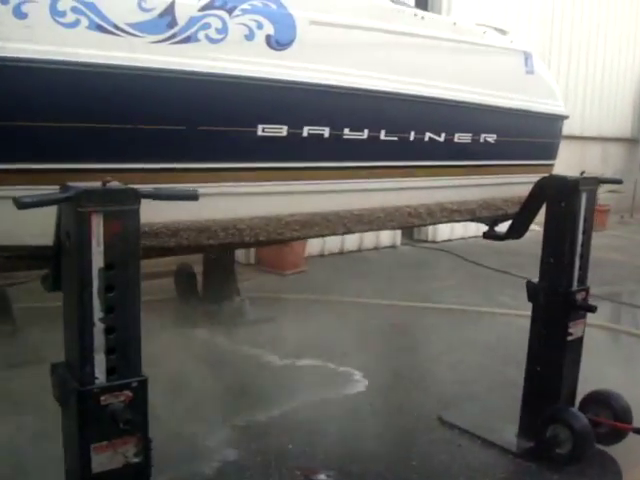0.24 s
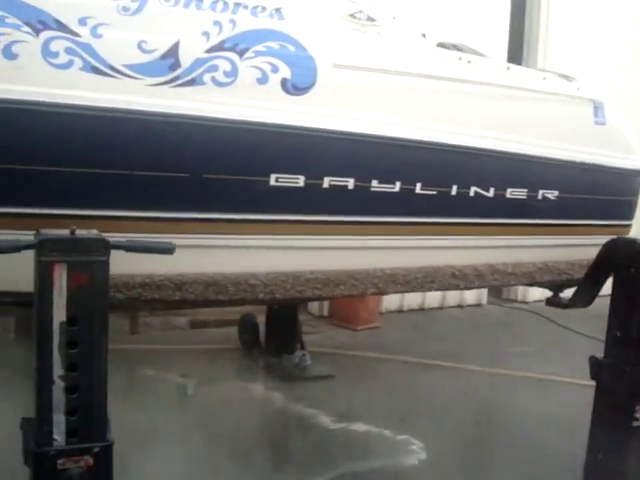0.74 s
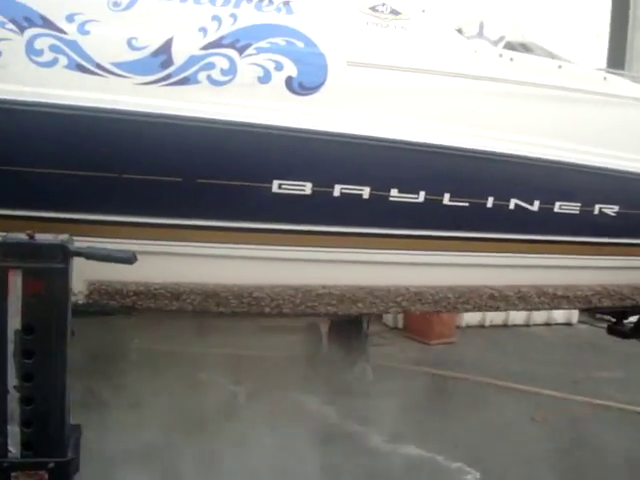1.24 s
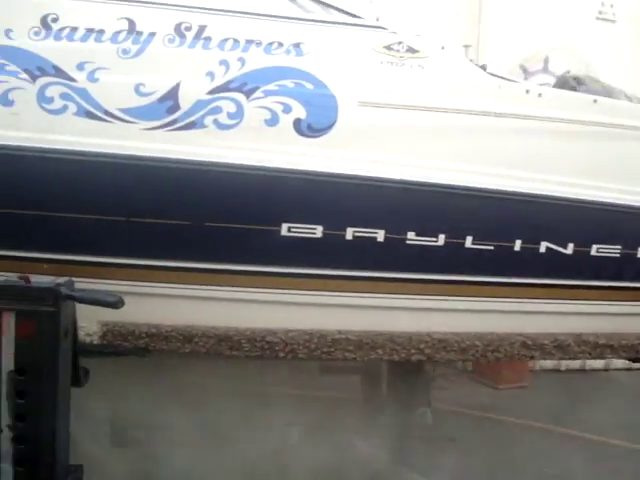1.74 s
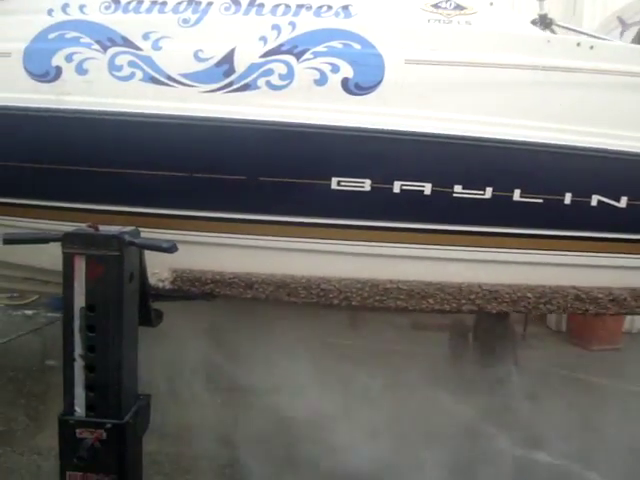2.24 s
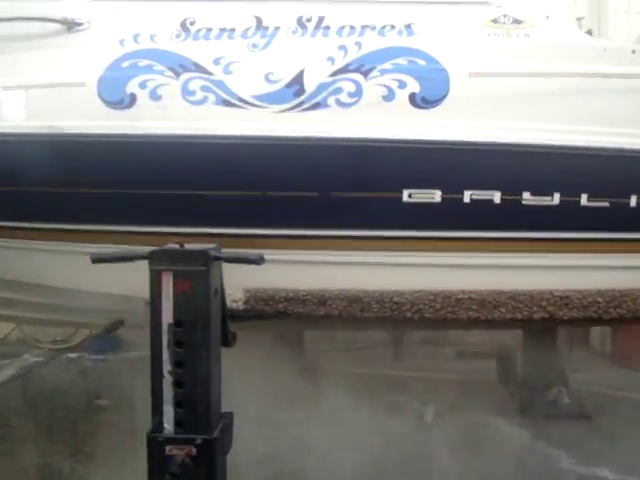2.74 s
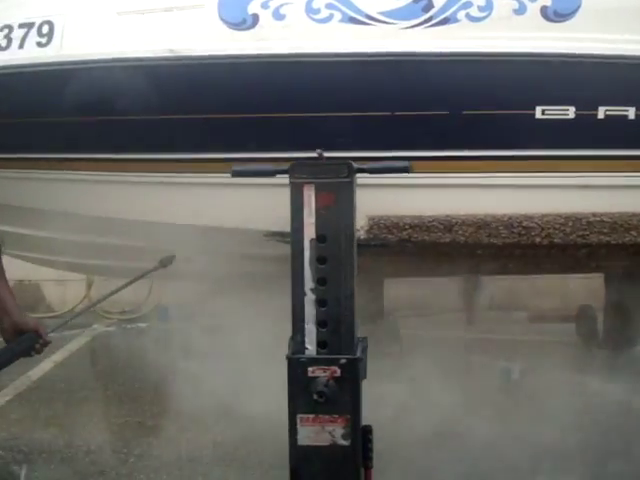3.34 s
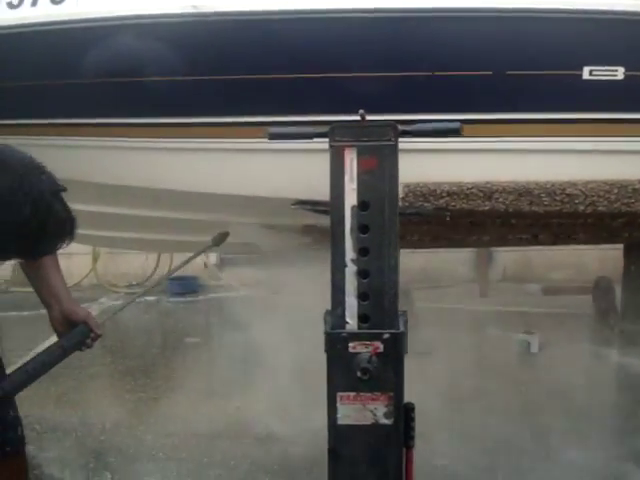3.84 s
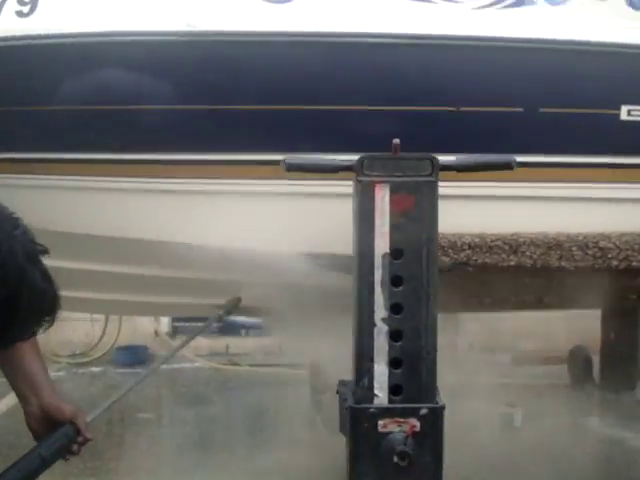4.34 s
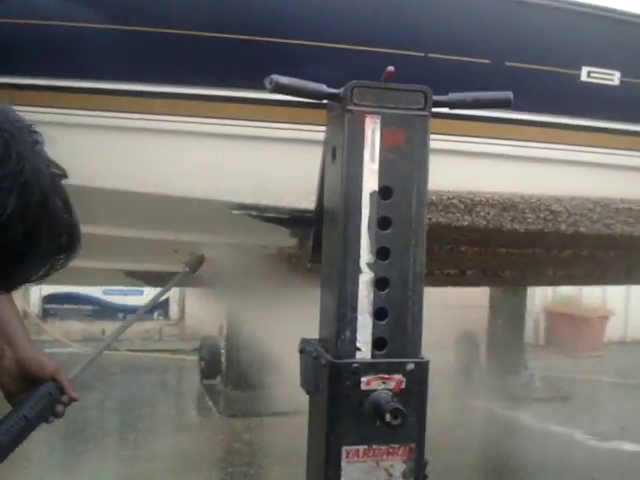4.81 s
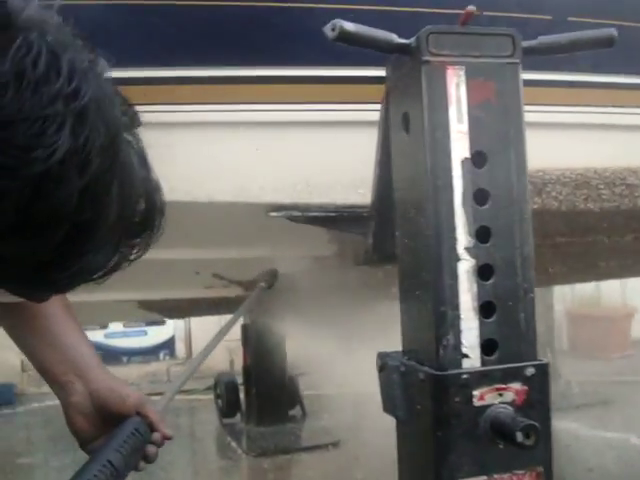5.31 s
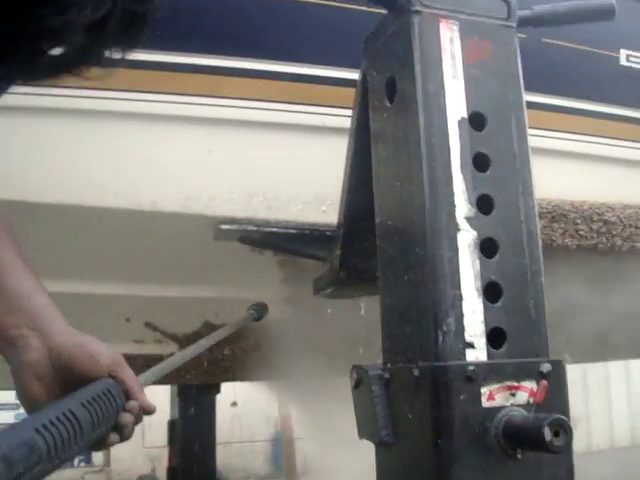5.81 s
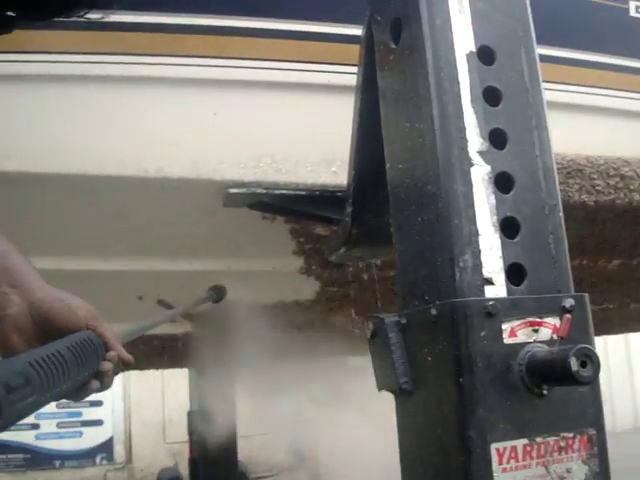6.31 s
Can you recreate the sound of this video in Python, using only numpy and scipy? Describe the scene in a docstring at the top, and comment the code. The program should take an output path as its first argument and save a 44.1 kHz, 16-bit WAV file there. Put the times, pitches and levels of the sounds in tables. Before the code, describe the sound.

A pressure washer's spinning jet roars, buzzes and hisses against a hollow boat hull, swelling and easing as the spray moves.

```python
"""A pressure washer's spinning jet strips growth off a boat hull, a few steps away in an open yard.
From the start, one blow a turn drives the hollow shell's panel modes, their balance set by where the jet
lands; torn water roars and hisses in that rhythm, grit spatters and the pump hums far off.
Near 1.7 s the jet digs in and roar, drone and whine swell; near 2.9 s it slips off and the roar drops.
The spray's hiss then peaks near 4.2 s and 5.3 s, and near 5.7 s a square hit turns roar into slaps."""
import sys
import numpy as np
from scipy import signal
from scipy.fft import rfft, irfft, next_fast_len
from scipy.io import wavfile
from scipy.ndimage import uniform_filter1d, map_coordinates

SR = 44100
rng = np.random.default_rng(int(sys.argv[2]) if len(sys.argv) > 2 else 0)


def wrap_up_sound(samples):
    """Save the sound to the file named by the first command line argument, as 16-bit audio."""
    columns = np.atleast_2d(samples).T
    # keep every value between -1 and 1, then stretch to whole-number steps
    tamed = np.clip(columns, -1, 1)
    steps = np.round(tamed * 32767).astype(np.int16)
    wavfile.write(sys.argv[1], SR, steps)


N = 289296

# Rotation of the jet (time [s], rate [turns/s])
JET_SPEED = [(0, 163.9), (.45, 167), (.7, 165.5), (1.1, 166.4), (2.2, 164.4), (2.6, 166), (2.9, 163),
             (3.85, 163), (4.15, 161.5), (4.35, 162.5), (4.8, 161.9), (5.2, 163), (5.45, 162.4),
             (6.56, 165.6)]
# Roar on the hull, rising as the jet digs in and falling as it slips off (time [s], level [dB])
ROAR_LEVEL = [(0, -28), (.44, -29.5), (.52, -32.5), (.86, -33), (1.3, -30), (1.56, -26), (1.69, -21),
              (1.8, -21.5), (1.97, -25), (2.1, -22), (2.41, -21.5), (2.48, -25), (2.62, -22.5),
              (2.82, -24.5), (2.9, -30), (3.35, -27.5), (3.6, -28.5), (4.02, -26), (4.1, -28.5),
              (4.78, -33), (5.03, -26.5), (5.12, -30), (5.56, -31.5), (5.66, -29.5), (6.3, -33.5),
              (6.45, -28), (6.56, -29.5)]
# Panel modes of the hull
# (frequency [Hz], half-width [Hz], offset [dB], gain with lean [dB/dB], extra gain with roar [dB/dB])
PANEL_MODES = [(167, 33, 0.5, 0.5, 0), (322.4, 28, 1, 1, 0), (481, 28, 0.8, -1, 0.05),
               (659.6, 33, -0.3, -0.95, 0), (815, 54, -0.5, 1, 0), (1173, 79, 0, -0.1, 0.25)]
# Boom of mode 1 (time [s], level [dB])
BOOM_LEVEL = [(0, -53), (.68, -75), (1.4, -62), (1.7, -53), (2.84, -49.5), (2.96, -59), (3.18, -47.5),
              (4.2, -52), (4.34, -61), (4.9, -55.5), (6.1, -61), (6.3, -50), (6.56, -60)]
# Drone of modes 2 and 3 (time [s], level [dB], lean towards mode 2 [dB])
DRONE_LEVEL = [(0, -37, -5), (.28, -47, 8), (.72, -51, 2), (1.04, -43, 3), (1.7, -32, -1),
               (2.15, -35, -7.5), (2.38, -31, -4), (2.6, -30.5, -3), (3.2, -46, -3.5), (3.5, -41, -2.5),
               (3.95, -35, -2.5), (4.1, -40.5, -2.5), (4.55, -37.5, -2), (5.2, -41.5, -1.5),
               (5.42, -35, -4.5), (5.6, -38.5, 1), (6.06, -41, -3.5), (6.24, -51, -4), (6.56, -48.5, -3)]
# Whine of modes 4 to 6 (time [s], level over the roar [dB], lean from mode 4 to mode 5 [dB])
WHINE_LEVEL = [(0, -10, -2), (.25, -14.5, 3), (.78, -14, -3), (.92, -8, 7), (1.45, -5, 4),
               (1.73, -1.5, 3.5), (2.0, -5.5, -5), (2.2, -5.5, 2.5), (2.7, -6, 1), (3.2, -10, -4.5),
               (3.53, -6, -7.5), (3.75, -16.5, -8.5), (4.02, -9, -7), (4.14, -22, -4), (4.3, -8, 4),
               (4.78, -18, -4), (4.96, -8.5, -1), (5.5, -22, -4), (5.64, -7, 0.5), (6.2, -15, -3),
               (6.56, -17, -5)]
# Rumble of the shell (frequency [Hz], relative level [dB])
RUMBLE_SPECTRUM = [(30, -11), (100, 0), (220, -0.5), (500, -28.5), (2000, -70)]
# How squarely the jet bites (time [s], slap over roar [dB], relative throb depth [0-1])
JET_BITE = [(0, -6, .3), (1.3, -3, 0.32), (1.72, 0.5, 0.1), (2.2, -2, .05), (3.4, 1, 0.53), (3.9, -7, 0.2),
            (4.4, -1, 0.63), (5.25, 1, 0.3), (5.68, 7.5, .6), (6.25, -8, 0.66), (6.56, 0.5, 0.63)]
# Roar of torn water (frequency [Hz], relative level [dB])
ROAR_SPECTRUM = [(30, -47.5), (100, -32), (250, -15.5), (400, -6.5), (700, 1.3), (1200, -0.5), (2000, -2.5),
                 (3500, -12), (8000, -25.5)]
# Slap of one blow (frequency [Hz], relative level [dB])
SLAP_SPECTRUM = [(300, -32), (700, -0.5), (1000, -13), (1300, 3.5), (1900, -3), (3000, -10.5),
                 (5000, -20.5), (10000, -22)]
# Buzz of the hull's skin (harmonic [multiple of the rotation rate], relative level [dB])
BUZZ_HARMONICS = [(6, 3), (7, -1), (8, 4), (9, -2.5), (10, 2), (11, 0.5), (12, -0.5), (13, -8), (14, -8),
                  (15, -5), (16, -8), (18, -3)]
# Hiss of the spray (time [s], relative level [dB])
SPRAY_ENVELOPE = [(0, -26), (.45, -25.5), (.52, -28.5), (1.05, -27), (1.3, -31.5), (1.68, -24.5),
                  (2.38, -23.5), (2.5, -27.5), (2.9, -27.5), (3.52, -28.5), (3.62, -25), (4.15, -22),
                  (4.38, -24.5), (4.86, -23.5), (4.93, -26.5), (5.3, -22.5), (5.5, -26), (6.1, -26),
                  (6.56, -34)]
# Colour of the spray (frequency [Hz], relative level [dB])
SPRAY_SPECTRUM = [(200, -33), (700, -36), (1500, -10), (2200, -0.5), (3000, 0.5), (4200, -2), (6000, -6),
                  (10000, -17.5)]
# High hiss of the mist (time [s], relative level [dB])
MIST_ENVELOPE = [(0.0, -27), (0.04, -26), (0.96, -26.5), (1.38, -32), (1.88, -28), (3.48, -31),
                 (3.82, -26.5), (4.78, -30.5), (4.88, -27.5), (5.8, -30.5), (5.9, -28), (6.42, -29.5),
                 (6.56, -25)]
# Colour of the mist (frequency [Hz], relative level [dB])
MIST_SPECTRUM = [(1000, -34), (3500, -11), (5500, -1), (7500, 2.5), (9000, 2), (10000, -1)]
# Pump tones, the first at the stroke rate (frequency [Hz], level [dB])
PUMP_TONES = [(74.5, -85), (146, -66.5), (722, -65)]
# Reverberation of the yard (frequency [Hz], time to decay by 60 dB [s])
YARD_DECAY = [(200, 0.44), (2000, 0.2), (10000, 0.06)]
# Brief dips in the water's sound (time [s], depth [dB], half-width [s])
WATER_DIPS = [(0.567, 6, .005), (.86, 2.5, 0.032), (1.056, 23, 0.0022)]


def amp(db):
    """Amplitude ratio of a level in decibels."""
    return 10 ** (np.asarray(db) / 20)


def unit(x):
    """Normalisation to rms 1."""
    return x / np.sqrt(np.mean(x ** 2) + 1e-20)


def along(points, hz):
    """Interpolation of (frequency, value) points on a logarithmic frequency axis."""
    freqs, values = np.transpose(points)
    return np.interp(np.log(hz + 1), np.log(freqs), values)


def curves(rows):
    """Linear interpolation in time: one value per sample for each later column."""
    times, *columns = np.transpose(rows)
    return [np.interp(np.arange(N) / SR, times, column) for column in columns]


def wobble(rate):
    """Smooth random modulation: a spline through `rate` Gaussian knots a second."""
    coarse = np.arange(0, N + 32, 32)
    knots = rng.standard_normal(int(N * rate / SR) + 4)
    return np.interp(np.arange(N), coarse, map_coordinates(knots, [coarse * rate / SR]))


def filtered(x, response):
    """Linear filtering: the spectrum of x times a complex frequency response."""
    size = 2 * next_fast_len((N + SR // 2) // 2)
    return irfft(rfft(x, size) * response(np.fft.rfftfreq(size, 1 / SR)), size)[:N]


def coloured(x, spectrum):
    """Minimum-phase filtering to the given spectral shape, at rms 1."""
    def response(hz):
        cepstrum = irfft(np.log(amp(along(spectrum, hz))))
        half = len(cepstrum) // 2
        return np.exp(rfft(np.r_[cepstrum[0], 2 * cepstrum[1:half]], 2 * half))
    return unit(filtered(x, response))


def impulses(at, sizes):
    """Sinc interpolation places band-limited impulses at fractional sample positions."""
    taps = np.floor(at).astype(int)[:, None] + np.arange(-7, 9)
    offset = taps - at[:, None]
    shape = np.sinc(offset) * np.sinc(offset / 8)
    return np.bincount(np.clip(taps, 0, N).ravel(), (sizes[:, None] * shape).ravel(), N + 1)[:N]


def blows(turns, jitter_s, scatter_db):
    """Quasi-periodic excitation: one blow a turn, scattered in timing and force."""
    at = np.interp(np.arange(1, int(turns[-1])), turns, np.arange(N))
    timing, force = rng.standard_normal((len(at), 2)).T
    return impulses(at + jitter_s * SR * timing, amp(scatter_db * np.clip(force, -2, 2)))


def hull(hits, roar_db, waver_db=2):
    """Forced vibration: the blows ring panel modes that waver as the jet wanders, over a shell rumble."""
    boom = curves(BOOM_LEVEL)[0], 0
    drone = curves(DRONE_LEVEL)
    whine_db, whine_lean = curves(WHINE_LEVEL)
    whine = roar_db + whine_db, whine_lean
    force_db = roar_db - roar_db.mean()
    rumble_db = roar_db - 36.5 + .4 * force_db
    out = amp(rumble_db) * coloured(rng.standard_normal(N), RUMBLE_SPECTRUM)
    drives = [boom, drone, drone, whine, whine, whine]
    for (hz, half_width, db, swing, grows), (level_db, lean_db) in zip(PANEL_MODES, drives):
        def resonance(f):
            damping = 2j * f * half_width
            return (damping / (hz * hz - f * f + damping)) ** 2
        mode_db = db + level_db + swing * lean_db + grows * force_db + waver_db * wobble(22)
        out += amp(mode_db) * unit(filtered(hits, resonance))
    return out


def turbulence(patchy_db):
    """Turbulent noise: a white spectrum with random patches of gain in time and frequency."""
    spectra = signal.stft(rng.standard_normal(N), nperseg=512)[2]
    patches = uniform_filter1d(rng.standard_normal(spectra.shape), size=7, axis=0)
    patches = uniform_filter1d(patches, size=16, axis=1)
    return unit(signal.istft(spectra * amp(patchy_db * unit(patches)), nperseg=512)[1][:N])


def throb(turns, depth, sharpness):
    """Amplitude modulation: a gain of mean power 1 that peaks once a turn."""
    burst = np.exp(sharpness * np.cos(2 * np.pi * turns))
    depth = np.clip(depth, 0, 1)
    return np.sqrt(1 - depth + depth * burst / burst.mean())


def impact(turns, hits, roar_db, slap_db, depth):
    """Jet impingement: power divides between roar and buzzing slaps, a square hit favouring the slaps."""
    roar = coloured(turbulence(patchy_db=1.0) * throb(turns, depth * 0.39, sharpness=1.2), ROAR_SPECTRUM)
    slaps = amp(-4.0) * coloured(hits, SLAP_SPECTRUM) + amp(-0.6) * buzz(turns)
    bite = amp(slap_db)
    blend = (roar + bite * slaps) / np.sqrt(1 + bite ** 2)
    return amp(roar_db + 0.42 + 0.84 * wobble(14)) * blend


def buzz(turns):
    """Modal overlap: the skin's crowded upper modes answer each turn with varying strength and phase."""
    out = np.zeros(N)
    for multiple, db in BUZZ_HARMONICS:
        answer = wobble(45) + 1j * wobble(45)
        out += amp(db) * np.real(answer * np.exp(2j * np.pi * multiple * turns))
    return unit(out)


def grit(per_second):
    """Shot noise: drops and flakes strike with equal force at random times."""
    at = N * rng.random(int(per_second * N / SR))
    return unit(impulses(at, np.ones(len(at))))


def spray(turns, depth):
    """Modulated noise: the hiss of torn water and the grit in it throb once a turn."""
    spatter = turbulence(patchy_db=0.98) + amp(-14.5) * grit(per_second=1300)
    level_db = curves(SPRAY_ENVELOPE)[0] + 0.22 + 0.5 * wobble(14) + 0.76 * wobble(110)
    return amp(level_db) * coloured(spatter * throb(turns, depth * 0.84, sharpness=2.4), SPRAY_SPECTRUM)


def mist(turns, depth, lag_turns=.17):
    """Phase lag: the fine mist's high hiss peaks just after each blow and leaves in small puffs."""
    puffs_db = 0.68 * wobble(14) + 1.48 * wobble(150)
    hiss = turbulence(patchy_db=0.6) * throb(turns - lag_turns, depth * 1.42, sharpness=1.2)
    return amp(curves(MIST_ENVELOPE)[0] + 4.5 + puffs_db) * coloured(hiss, MIST_SPECTRUM)


def water(turns, hits, roar_db):
    """Jet break-up: a slow surge and a fast shudder modulate impact, spray and mist together."""
    slap_db, depth = curves(JET_BITE)
    surge = amp(0.44 * wobble(30) + 0.44 * wobble(150))
    return surge * (impact(turns, hits, roar_db, slap_db, depth) + spray(turns, depth) + mist(turns, depth))


def pump(seconds):
    """Line spectrum: the distant pump hums in three slightly unsteady tones."""
    return sum(np.sqrt(2) * amp(db + 2.1 * wobble(2.2)) * np.sin(2 * np.pi * hz * seconds)
               for hz, db in PUMP_TONES)


def yard(x):
    """Diffuse reflection: ground, hulls and shed walls return a short tail whose treble decays first."""
    hz, t, spectra = signal.stft(rng.standard_normal(SR // 2), SR, nperseg=256)
    decay = amp(-60 * t / along(YARD_DECAY, hz)[:, None])
    tail = signal.istft(spectra * decay, SR, nperseg=256)[1]
    return signal.fftconvolve(x, tail / np.linalg.norm(tail))[:N]


def dips():
    """Transient attenuation: the level sags briefly along a Gaussian curve at each dip."""
    t = np.arange(N) / SR
    return amp(-sum(db * np.exp(-((t - at) / half_width) ** 2) for at, db, half_width in WATER_DIPS))


def scene():
    """Superposition: the jet drives hull and water; the pump hums, and its strokes swell the water."""
    (speed,), (roar_db,) = curves(JET_SPEED), curves(ROAR_LEVEL)
    turns = np.cumsum(speed * (1 + .006 * wobble(35))) / SR
    hits = blows(turns, jitter_s=.00004, scatter_db=3.5)
    pump_s = np.cumsum(1 + 0.0025 * wobble(6.7)) / SR  # time warped by the pump's uneven speed
    strokes = 1 + 0.073 * np.sin(2 * np.pi * PUMP_TONES[0][0] * pump_s)
    wash = dips() * strokes * water(turns, hits, roar_db)
    return (hull(hits, roar_db) + wash + amp(-16) * yard(wash) + pump(pump_s))[None]


def record(dry):
    """Band limiting: a steep low-pass filter removes the highest treble."""
    cutoff_hz, edge_hz = 10100, 100
    return filtered(dry[0], lambda hz: np.clip((cutoff_hz - hz) / edge_hz + .5, 0, 1))[None]


dry = scene()
out = record(dry)
wrap_up_sound(out)
```